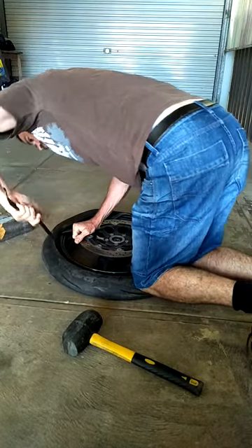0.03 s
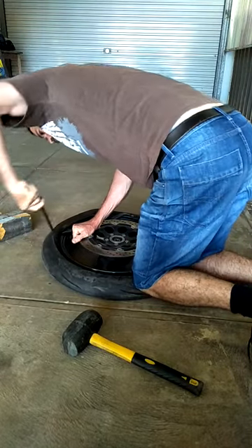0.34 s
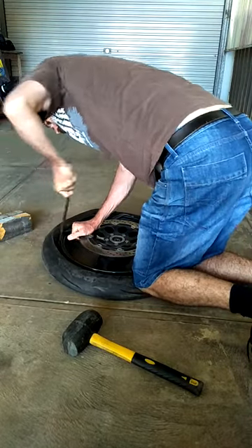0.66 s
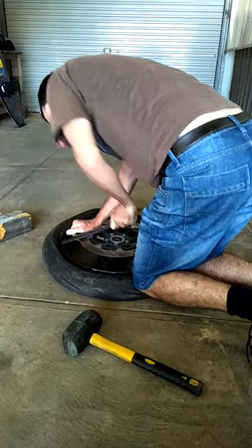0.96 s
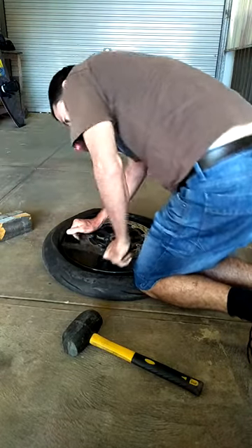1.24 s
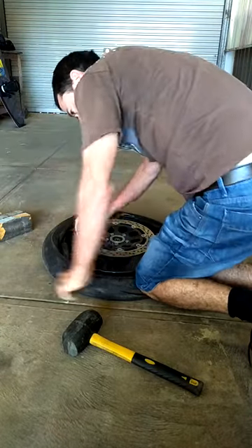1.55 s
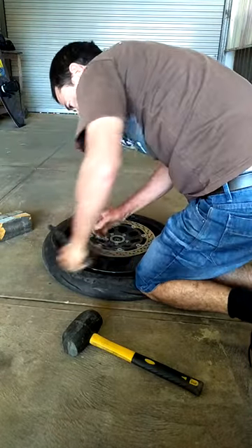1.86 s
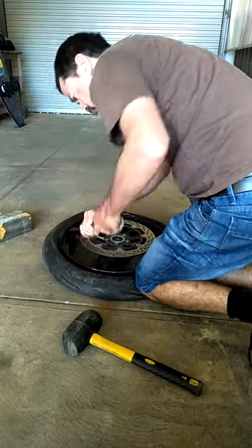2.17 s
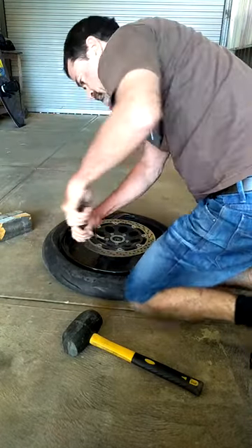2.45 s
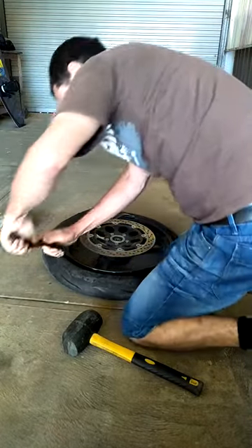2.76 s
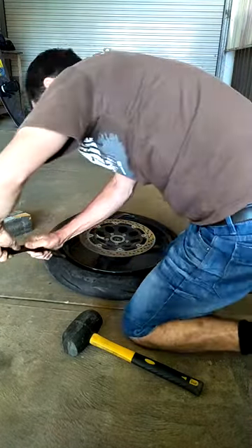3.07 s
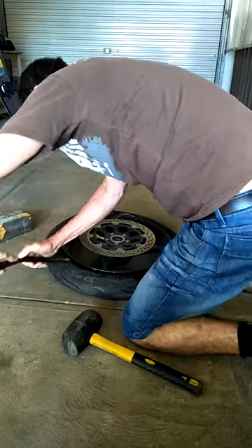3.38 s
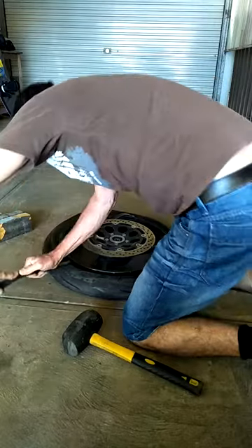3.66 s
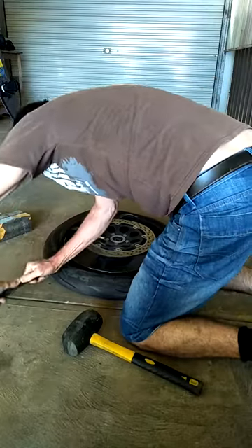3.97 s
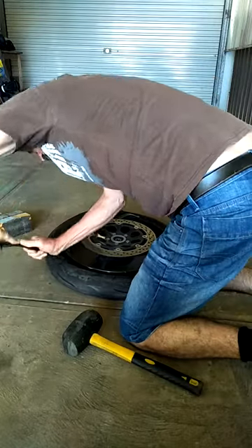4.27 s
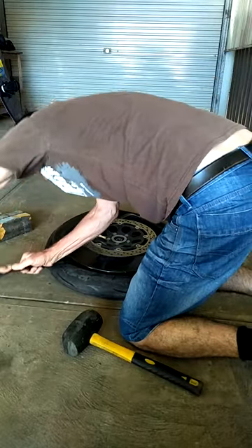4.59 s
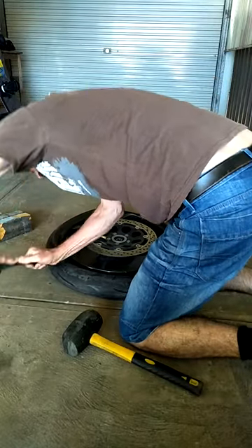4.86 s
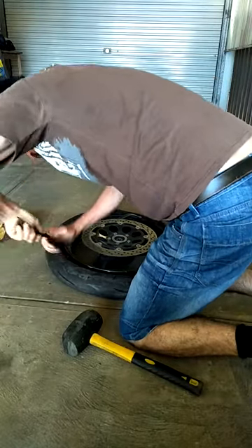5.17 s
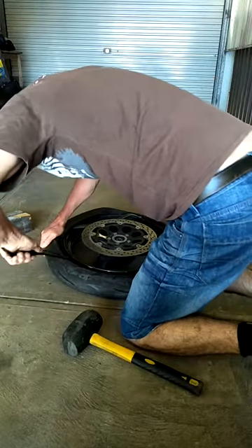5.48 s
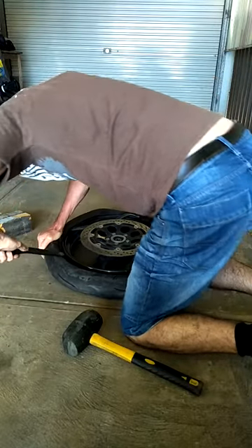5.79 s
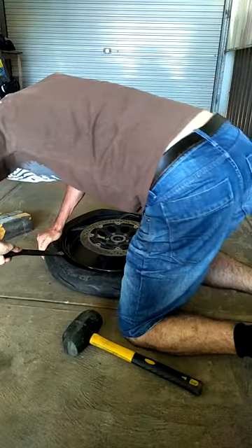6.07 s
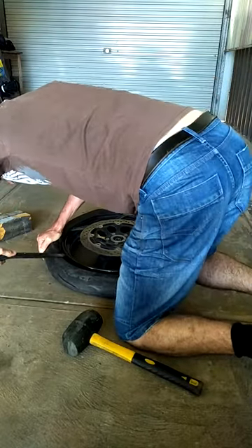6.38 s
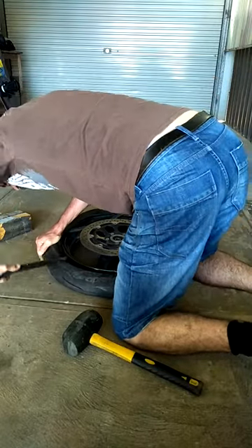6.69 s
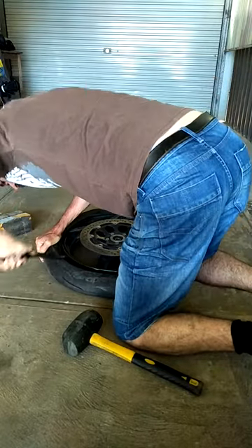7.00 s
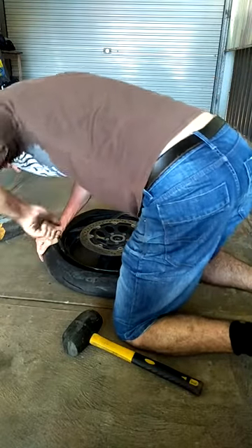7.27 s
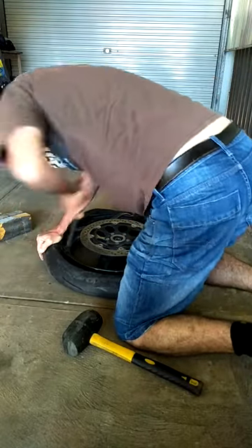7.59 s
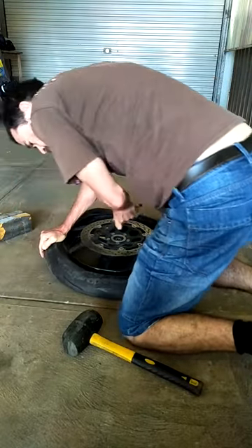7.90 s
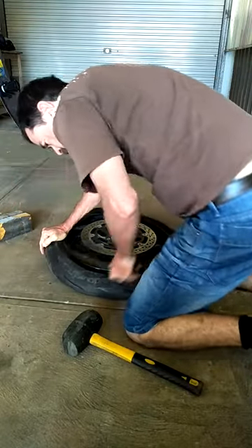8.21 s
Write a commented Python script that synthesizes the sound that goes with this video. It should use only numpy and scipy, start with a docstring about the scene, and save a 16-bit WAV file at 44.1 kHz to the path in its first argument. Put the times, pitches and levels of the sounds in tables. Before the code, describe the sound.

In an echoing garage, a tyre is levered over its rim near the microphone. A hard metal knock and a short ringing clatter come first, then scattered clunks, faint squeaks and a low rubber groan. Late on, the lever cracks against the wheel and the stiff rubber lets go in juddering thuds. Small taps, scrapes and shuffling clothes follow, all over a quiet rumble and very faint chirps.

```python
"""On the concrete floor of an echoing garage, a motorcycle tyre is levered over its rim.
A low rumble lies under the shuffle of clothes and a few faint chirps. The tyre's stiff rubber edge,
the bead, sticks and slips over the rim in a run of thuds. The steel lever knocks on the wheel,
clunks and scrapes while wedged under the bead, and rings when it comes free."""
import sys
import numpy as np
from scipy import signal
from scipy.fft import rfft, irfft
from scipy.io import wavfile
from scipy.ndimage import uniform_filter1d, minimum_filter1d

SR = 44100
rng = np.random.default_rng(int(sys.argv[2]) if len(sys.argv) > 2 else 0)


def digitize_waveform(pressure):
    """Quantize a signal to 16-bit integers and store it at the path in sys.argv[1].

    Rows of a 2-D input are taken as channels; values are limited to [-1, 1].
    """
    field = np.atleast_2d(pressure).T
    bounded = np.clip(field, -1, 1)
    quanta = np.round(bounded * 32767).astype(np.int16)
    wavfile.write(sys.argv[1], SR, quanta)


N = 367794
SIZE = 65536   # samples in one short sound; T holds its times and HZ its frequencies
T = np.arange(SIZE) / SR
HZ = np.maximum(np.fft.rfftfreq(SIZE, 1 / SR), 1)
SCENE_T = np.arange(N) / SR


def from_db(db):
    """Turn decibels into a gain."""
    return 10 ** (np.asarray(db) / 20)

def unit(x):
    """Scale a sound to an energy of one."""
    return x / np.sqrt(np.sum(x ** 2) + 1e-20)

def at_hz(points, hz):
    """Read between a table's rows, spacing frequencies by octaves."""
    freqs, values = np.transpose(points)
    return np.interp(np.log(hz), np.log(freqs), values)

def convolve(a, b):
    """Pass one short sound through another."""
    return irfft(rfft(a, 2 * SIZE) * rfft(b, 2 * SIZE))[:SIZE]

def add(out, s, sound, level_db):
    """Mix a sound in at s seconds, at the given average (rms) level over its first 60 ms."""
    head = sound[:int(.06 * SR)]
    start = int(s * SR)
    out[start:start + SIZE] += (from_db(level_db) * sound / np.sqrt(np.mean(head ** 2)))[:N - start]

def noise(spectrum):
    """Steady noise with the given tone colour and an average (rms) size of one."""
    hz = np.maximum(np.fft.rfftfreq(N, 1 / SR), 1)
    white = rfft(rng.standard_normal(N))
    return unit(irfft(white * from_db(at_hz(spectrum, hz)), N)) * np.sqrt(N)

def drift(per_s):
    """A curve that wanders from one random value to the next."""
    knots = rng.standard_normal(int(N / SR * per_s) + 2)
    return np.interp(SCENE_T * per_s, np.arange(len(knots)), knots)

def grains(per_s):
    """Tiny contacts of random size at random moments."""
    return (rng.random(SIZE) < per_s / SR) * rng.standard_normal(SIZE)

def rough_tap(rattle_db, fade_s, per_s):
    """The force of one tap and a fading rattle of tiny contacts."""
    force = from_db(rattle_db) * unit(grains(per_s) * np.exp(-T / fade_s))
    force[0] += 1
    return force

def fading_tone(hz, db, fade_s):
    """One ringing note that falls by 60 dB in fade_s."""
    return from_db(db) * np.sin(2 * np.pi * hz * T) * np.exp(-np.log(1000) * T / fade_s)

def struck(body, colour_db):
    """An object's answer to one tap. A body is two lists: its overall tone and its ringing peaks."""
    overall, peaks = body
    peaks_db = sum(height / (1 + (2 * (HZ - hz) / width) ** 2) for hz, width, height in peaks)
    db = at_hz(overall, HZ) + colour_db + peaks_db
    # minimum phase: the sound starts at once and the peaks ring on
    cepstrum = irfft(np.log(from_db(db)))
    cepstrum[1:SIZE // 2] *= 2
    cepstrum[SIZE // 2 + 1:] = 0
    return unit(irfft(np.exp(rfft(cepstrum))))


# The tone of the rumble and of the hiss. Each row: frequency in Hz, relative level in dB.
RUMBLE_TONE = [(15, -0.5), (30, 0.5), (45, 16.5), (62, 10.5), (100, 12), (160, 4.5), (230, -29.5),
               (400, -51.5)]
HISS_TONE = [(100, 28), (300, 5), (600, 14.5), (1500, 12.5), (3400, 8), (5000, -0.5), (8000, -3.5),
             (12000, -0.5), (15500, -1)]
def background(rumble_db=-48, hiss_db=-60):
    """A steady low rumble and a faint hiss."""
    return from_db(rumble_db) * noise(RUMBLE_TONE) + from_db(hiss_db) * noise(HISS_TONE)

# How long the garage rings. Each row: frequency in Hz, seconds to fade by about 60 dB.
GARAGE_FADE = [(60, 0.27), (170, 0.47), (500, 0.49), (1400, 0.41), (3700, 0.5), (6000, 0.28), (12000, 0.27)]
def garage_tails(count=6, build_s=0.0052, fade_curve=0.99, even_hz=45):
    """The room's wash of echoes at a few spots: each swells quickly, then dies band by band."""
    centres = np.geomspace(60, 14000, num=9)
    white = rfft(rng.standard_normal((count, SIZE)))
    tails = 0
    for hz, share in zip(centres, np.eye(len(centres))):
        band = irfft(white * np.interp(np.log(HZ), np.log(centres), share))
        age = (2 * T / at_hz(GARAGE_FADE, hz)) ** fade_curve
        tails = tails + band * np.exp(-np.log(1000) / 2 * age)
    swell = np.sqrt(1 - np.exp(-T / build_s))
    spectra = rfft(tails * swell)
    # the room's many overlapping notes share the energy evenly over frequency
    spectra /= np.sqrt(uniform_filter1d(np.abs(spectra) ** 2, int(even_hz * SIZE / SR)))
    return [unit(tail * swell * (T < T[-1] / 2)) for tail in irfft(spectra)]

# Echoes off the floor and near walls. Each row: typical delay in seconds, gain.
NEAR_ECHOES = [(.0009, 0.16), (.0021, 0.56), (.0043, 0.62), (0.012, .4), (0.0175, 0.21)]
def in_garage(sound, room_db, tails, spread=0.13):
    """The direct sound, near echoes that shift as the hands move, and the room's tail."""
    path = np.zeros(SIZE)
    path[0] = 1
    for s, gain in NEAR_ECHOES:
        path[int(s * SR * np.exp(spread * rng.standard_normal()))] += gain
    room = convolve(sound, tails[rng.integers(len(tails))])
    return unit(convolve(sound, path)) + from_db(room_db) * unit(room)

def chirps(loudest_db=-68, low_hz=2600, high_hz=4400, length_s=0.11, waver=0.055, count=70):
    """Faint, short chirps of wavering pitch, scattered at random."""
    out = np.zeros(N)
    swell = np.sin(np.pi * np.minimum(T / length_s, 1)) ** 2
    for when, pitch, faintness in rng.random((count, 3)):
        wobble = np.interp(np.arange(SIZE), np.arange(0, SIZE, 64), rng.standard_normal(SIZE // 64))
        hz = low_hz * (high_hz / low_hz) ** pitch * (1 + waver * wobble)
        chirp = swell * np.sin(2 * np.pi * np.cumsum(hz) / SR)
        add(out, when * (N - 1) / SR, chirp, loudest_db - 6 * faintness)
    return out

# The tone of rubbing cloth. Each row: frequency in Hz, relative level in dB.
CLOTH_TONE = [(120, -13), (250, 12), (400, 2), (700, -21), (1500, -35.5), (3500, -82), (7000, -67)]
# The worker shifts about. Each row: middle in seconds, length in seconds, level in dB.
BODY_SHIFTS = [(0.054, 1.5, -68.5), (4.22, 1.7, -62), (5.496, 1.28, -53), (5.962, 1, -42),
               (7.328, 0.95, -39), (7.769, 0.34, -38.5), (8.0, 0.45, -40), (8.314, 0.53, -46.5)]
def clothes(uneven_db=3):
    """Clothes rub in an uneven swell with each shift of the body."""
    swells = sum(from_db(level_db) * np.cos(np.pi * np.clip((SCENE_T - s) / length, -.5, .5)) ** 2
                 for s, length, level_db in BODY_SHIFTS)
    return swells * from_db(uneven_db * drift(per_s=54)) * noise(CLOTH_TONE)

# The tone of groaning rubber. Each row: frequency in Hz, relative level in dB.
GROAN_TONE = [(30, -16.5), (80, -4.5), (120, -2.5), (152, 0.5), (200, -8.5), (280, -21.5), (450, -37),
              (1000, -61.5)]
# The groan follows the weight on the tyre. Each row: time in seconds, level in dB.
GROAN_LEVELS = [(0, -48), (.5, -58.5), (2.3, -61), (3.2, -40.5), (3.75, -58.5), (4.03, -39), (4.5, -48.5),
                (5, -40.5), (6.5, -41), (7.1, -37.5), (8.34, -38)]
def tyre_groan(uneven_db=3):
    """The rubber groans as knees and hands lean on it."""
    level_db = np.interp(SCENE_T, *np.transpose(GROAN_LEVELS))
    return from_db(level_db + uneven_db * drift(per_s=22)) * noise(GROAN_TONE)

# The stretched bead creeps with dull thuds. Each row: start in seconds, level in dB.
BEAD_CREEPS = [(6.125, -33), (6.263, -28.5), (6.29, -23.5), (6.345, -27.5), (6.393, -28.5)]
def bead_creeps(cutoff_hz=93, room_db=-7.5):
    """List the small, dull slips of the bead before it lets go."""
    return [(s, level_db, cutoff_hz, room_db) for s, level_db in BEAD_CREEPS]

def bead_jerks(start_s=6.61, gap_s=.029, slowing=1.1, peak_db=-8, peak_after_s=0.072, room_db=-5.5):
    """List the jerks as the bead lets go: they swell briefly, then slow, weaken and grow duller."""
    elapsed = 0
    for k in range(10):
        rising_db = 47.5 * (peak_after_s - elapsed)
        falling_db = min(116 * (elapsed - peak_after_s), 18.5)
        drop_db = max(rising_db, falling_db)
        cutoff_hz = 740 / 2 ** (drop_db / 7.5)   # an octave duller for every 7.5 dB lost
        yield start_s + elapsed, peak_db - drop_db, cutoff_hz, room_db
        elapsed += gap_s * slowing ** k

# The hollow tyre. Each row of the first list: frequency in Hz, level in dB.
# Each row of the second: ringing peak in Hz, width in Hz, height in dB.
TYRE_BODY = ([(20, -25.5), (50, -5), (80, 0), (125, 3.5), (250, -3.5), (600, -12), (1500, -14),
             (5000, -14)], [(90.4, 28, 8.6), (143.6, 16, 7.5), (169.2, 13, 10), (200.2, 7.9, 12.6),
             (247, 36, 8.7), (320, 71, 10)])
def bead_thuds(tails):
    """Rubber sticks and lets go, giving the hollow tyre soft, juddering pushes."""
    out = np.zeros(N)
    for s, level_db, cutoff_hz, room_db in [*bead_creeps(), *bead_jerks()]:
        force = rough_tap(rattle_db=-4, fade_s=0.01, per_s=600)
        softness_db = -10 * np.log10(1 + (HZ / cutoff_hz) ** 5)
        thud = convolve(force, struck(TYRE_BODY, softness_db))
        add(out, s, in_garage(thud, room_db, tails), level_db)
    return out

# The rim's notes. Each row: pitch in Hz, relative level in dB, seconds to fade by 60 dB.
RIM_NOTES = [(504, 2.5, 0.11), (1380, 0, 0.07), (1841, -2, 0.14), (1877, -2, 0.17), (2910, -6.5, 0.097),
             (3020, -13.5, 0.17), (3620, -20, 0.11)]
# Light touches on the freed rim. Each row: start in seconds, level in dB.
RIM_TOUCHES = [(7.105, -35.5), (7.317, -35)]
def rim_touches(tails, room_db=2, attack_s=0.0046):
    """Every touch sets the rim's notes ringing in a slightly different balance."""
    out = np.zeros(N)
    for s, level_db in RIM_TOUCHES:
        ring = sum(fading_tone(hz, db + 2 * rng.standard_normal(), fade) for hz, db, fade in RIM_NOTES)
        ring *= 1 - np.exp(-T / attack_s)
        add(out, s, in_garage(ring, room_db, tails), level_db)
    return out

# The rim's tone, which colours every rub, laid out like TYRE_BODY.
RIM_BODY = ([(40, -32), (150, -16), (400, -7.5), (800, -25.5), (1600, -16), (2400, -15), (3200, -20),
            (4500, -28), (5600, -43), (8000, -52), (16000, -47.5)], [(510, 120, 18), (888, 66, 25),
            (1340, 44, 10), (1570, 70, 8.8), (1770, 120, 16), (2410, 70, 7.9), (2945, 110, 15),
            (3570, 91, 9.9), (4120, 140, 6.1)])
# Scrapes and squeaks of steel, and at 7.676 s a short, low rustle of clothes. Each row: start in
# seconds, length in seconds, level in dB, favoured frequency in Hz, rough width around it in octaves.
SCRAPES_AND_RUSTLE = [(.63, 0.081, -46.5, 2430, 9), (.66, 0.096, -53, 11000, 1.3),
                      (.876, 0.011, -29, 2440, 2.5), (1.354, 0.17, -57, 4420, 0.62),
                      (1.625, 0.074, -19.5, 1190, .8), (2.66, 0.1, -49, 6360, 0.85),
                      (5.288, 0.16, -58, 423, .7), (5.933, 0.078, -61, 946, .2), (7.08, .06, -37, 890, 1.7),
                      (7.258, 0.052, -40, 1120, 1.1), (7.676, 0.1, -40.5, 300, 0.48),
                      (7.856, 0.032, -35, 2380, 0.25), (7.94, 0.049, -37.5, 10900, 2.5),
                      (8.026, 0.03, -39, 4610, 1.66)]
RIM_SQUEAKS = [(2.65, 0.079, -45, 1766, 0.31), (5.128, .03, -58, 2390, .07),
               (5.244, 0.06, -62.5, 2260, .07), (5.361, 0.025, -58, 2260, 0.043),
               (6.02, 0.023, -57.5, 1305, 0.049)]
def rubs(strokes, tails, room_db, slips_per_s=2500, boost_db=38):
    """A stream of tiny slips, boosted in one range of pitch, makes a scrape, rustle or squeak."""
    out = np.zeros(N)
    for s, length, level_db, hz, octaves in strokes:
        stroke = np.sin(np.pi * np.minimum(T / length, 1))
        focus_db = boost_db / (1 + (np.log2(HZ / hz) / (2 * octaves)) ** 2)
        rub = convolve(grains(slips_per_s) * stroke, struck(RIM_BODY, focus_db))
        add(out, s, in_garage(rub, room_db, tails), level_db)
    return out

# The struck wheel, laid out like TYRE_BODY. The knocks below use it too.
WHEEL_BODY = ([(40, -26.5), (90, -15), (140, -1.5), (350, -0.5), (850, -9), (1700, -2), (2500, -5.5),
              (3600, -10.5), (4600, -19.5), (5600, -33.5), (8000, -53), (12500, -57.5), (16000, -70.5)],
              [(126.6, 41, 12.5), (303, 16, 4), (343, 89, 3.5), (504, 87, 8.5), (608, 16, 7.5),
              (690, 56, 7.5), (921, 51, 8.5), (1080, 45, 2.5), (1248, 94, 7), (1660, 60, 5.5),
              (1743, 510, 3), (2240, 360, 4.5), (2570, 58, 2), (2770, 86, 6.5)])
# The free lever's notes. Each row: pitch in Hz, level in dB before tilting, seconds to fade by 60 dB.
LEVER_NOTES = [(1606, -2, 0.099), (1880, -5.5, 0.19), (2740, -10, 0.28), (2660, -23, 0.21),
               (3350, -3.5, 0.17), (3680, -3, 0.11), (3680, -4.5, 0.097), (4570, -18.5, 0.16),
               (4780, -14.5, 0.14), (7750, -42.5, .12), (9625, -41, .12), (11200, -28, 0.099),
               (12000, -36, .12), (12800, -33.5, .15), (13950, -46.5, .12), (15100, -35.5, .12)]
# The lever comes free. Each row: start in seconds, level in dB, tilt toward treble in dB per octave.
LEVER_CLINKS = [(1.684, -22, -3.5), (1.786, -15.5, 0)]
def lever_clinks(tails, contact_db=2, contact_tilt_db=2, room_db=7):
    """The loosely held bar touches the wheel, then rings as it bends to and fro."""
    out = np.zeros(N)
    for s, level_db, tilt_db in LEVER_CLINKS:
        ring = sum(fading_tone(hz, db + tilt_db * np.log2(hz), fade) for hz, db, fade in LEVER_NOTES)
        contact = struck(WHEEL_BODY, (tilt_db + contact_tilt_db) * np.log2(HZ))
        clink = unit(ring) + from_db(contact_db) * contact
        add(out, s, in_garage(clink, room_db, tails), level_db)
    return out

def with_bounces(blows, gap_s=0.031, widening=1.15, bounce_rattle_db=3.5, bounce_room_db=11.5):
    """List each blow and its bounces, which come at widening gaps, each weaker than the last."""
    for s, level_db, rattle_db, room_db, *colour, bounces in blows:
        yield s, level_db, rattle_db, room_db, colour
        for k in range(bounces):
            s += gap_s * widening ** k
            yield s, level_db - 10 - 3 * k, bounce_rattle_db, bounce_room_db, colour

# The dry snap of steel that opens a hard blow. Each row: frequency in Hz, relative level in dB.
SNAP_TONE = [(300, -15.5), (2000, 2), (3000, 1.5), (5000, -24.5), (7500, -33.5), (12000, -37.5),
             (16000, -48)]
# The lever wedged under the bead, laid out like TYRE_BODY.
WEDGED_BODY = ([(40, -25), (150, -9.5), (400, 3.5), (750, -12.5), (1150, -11.5), (1400, 0), (1850, -7.5),
               (2300, -7.5), (2650, -14), (3300, -11.5), (4500, -21.5), (5600, -38), (8000, -51.5),
               (12500, -52), (16000, -60)], [(378, 67, 7.8), (509, 93, 20.7), (599, 19, 21), (896, 174, 13),
               (1006, 31, 12), (1302, 114, 7.6), (1480, 46, 2.1), (1528, 20, 4.3), (2006, 340, 3.2),
               (2244, 390, 6.9), (2938, 300, 7.6), (3220, 40, 2)])
# The wedged lever slips and clunks; the lever knocks on the wheel. Each row: start in seconds, level
# in dB, rattle and room in dB against the tap, bass, low-mid and treble boosts in dB, bounce count.
WEDGED_CLUNKS = [(2.831, -17, 1.2, 7.1, -5, -8, 4.5, 0), (3.067, -27.5, 0.3, 7.8, -22.5, -3, 2, 0),
                 (3.307, -27.5, 3.4, 6.2, -8.5, -3, 10.5, 0),
                 (4.199, -33.5, -1.5, 9.3, 8.5, -7.5, -29.5, 0), (5.585, -17.5, 0, 13.7, -0.5, -18, 9.5, 0)]
WHEEL_KNOCKS = [(.505, -23.5, 11, 1, -6.5, 2, 0, 3), (.8865, -5, -14, -4.5, -3, -0.5, -1.5, 3),
                (1.490, -12.5, -5.5, 11, -9.5, -0.5, -3.5, 0), (1.684, -11, 11, -2, 11, -2.5, -.5, 0),
                (1.750, -11, 0.5, 8, -16.5, 4.5, 4, 0), (6.547, -5, -9.5, -2.5, -13.5, 6, -4.5, 0),
                (7.317, -26.5, 15.5, 0, 10, 5, -1.5, 0), (7.874, -20, 10.5, 3, 11, 1.5, -4.5, 0)]
def lever_blows(blows, body, tails, rattle_s, bass_hz, treble_hz, hard_db=-9.5):
    """Steel taps and rattles on the rim; the spot and the grip set the tone, and hard blows crack."""
    out = np.zeros(N)
    for s, level_db, rattle_db, room_db, (bass_db, low_mid_db, treble_db) in with_bounces(blows):
        force = rough_tap(rattle_db, rattle_s, per_s=2500)
        crack_db = -5 + 2.5 * max(level_db - hard_db, 0)
        colour_db = (bass_db * np.exp(-np.log2(HZ / bass_hz) ** 2)
                     + low_mid_db * np.exp(-2 * np.log2(HZ / 520) ** 2)
                     + treble_db / (1 + (treble_hz / HZ) ** 4)
                     + crack_db / (1 + (6000 / HZ) ** 8))
        blow = convolve(force, struck(body, colour_db))
        add(out, s, in_garage(blow, room_db, tails), level_db)
        if level_db > hard_db:
            add(out, s, struck((SNAP_TONE, []), colour_db=0), level_db - 6.5)
    return out


def scene():
    """All the sources in one garage, heard in mono."""
    tails = garage_tails()
    knocks = lever_blows(WHEEL_KNOCKS, WHEEL_BODY, tails, rattle_s=.016, bass_hz=199, treble_hz=3000)
    clunks = lever_blows(WEDGED_CLUNKS, WEDGED_BODY, tails, rattle_s=.011, bass_hz=255, treble_hz=2546)
    rubbing = rubs(SCRAPES_AND_RUSTLE, tails, room_db=-0.5)
    squeaks = rubs(RIM_SQUEAKS, tails, room_db=0.5)
    steel = knocks + clunks + squeaks + lever_clinks(tails) + rim_touches(tails)
    rubber = bead_thuds(tails) + tyre_groan()
    return (steel + rubbing + rubber + clothes() + chirps() + background())[None]

def gain_control(x, threshold_db=-13.5, most_cut_db=8.5, recovery_db_per_s=1.5):
    """Loud blows turn the volume down at once, and it creeps back up."""
    level_db = 10 * np.log10(np.abs(uniform_filter1d(x ** 2, size=265)) + 1e-12)
    cut_db = np.clip(level_db - threshold_db, 0, most_cut_db)
    recovery_db = recovery_db_per_s * SCENE_T
    held_cut_db = np.maximum.accumulate(cut_db + recovery_db, axis=-1) - recovery_db
    return x * from_db(-held_cut_db)

def record(dry, ceiling=.72, cutoff_hz=16150):
    """Turn loud moments down, hold the sharpest peaks under a ceiling and cut the highest treble."""
    levelled = gain_control(dry)
    needed_gain = ceiling / np.maximum(np.abs(levelled), ceiling)
    smooth_gain = uniform_filter1d(minimum_filter1d(needed_gain, size=89), size=89)
    lowpass = signal.cheby2(16, 60, cutoff_hz, fs=SR, output="sos")
    return signal.sosfilt(lowpass, levelled * smooth_gain)


dry = scene()
out = record(dry)
digitize_waveform(out)
```